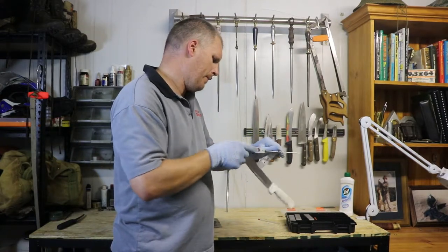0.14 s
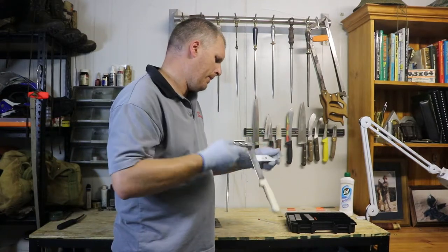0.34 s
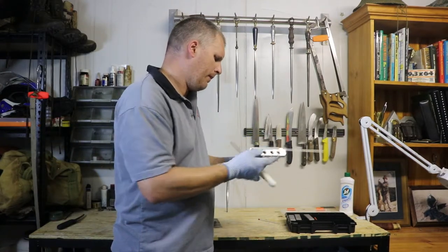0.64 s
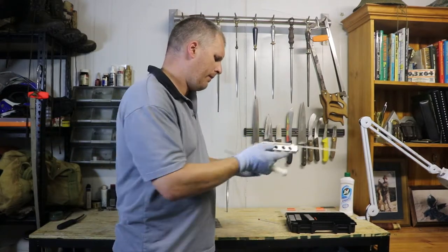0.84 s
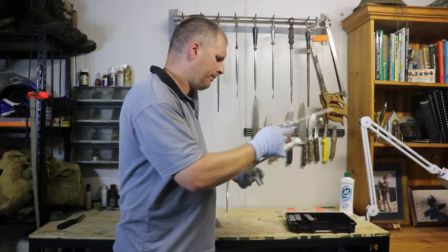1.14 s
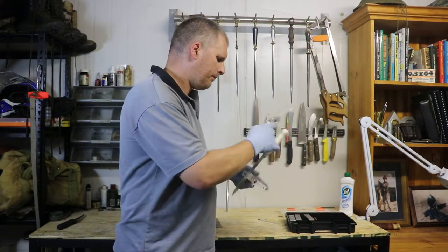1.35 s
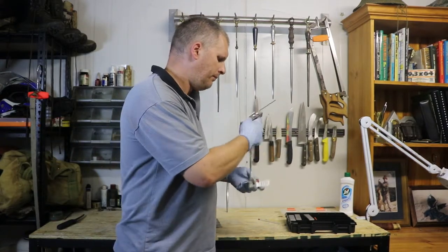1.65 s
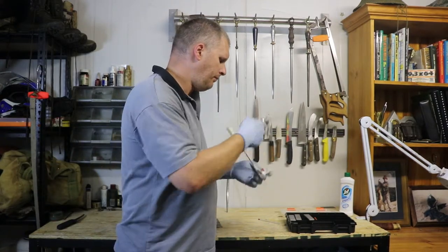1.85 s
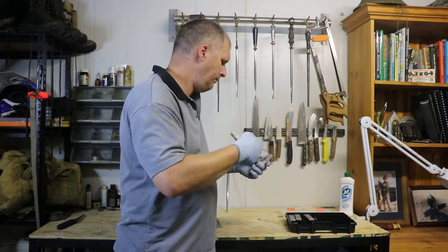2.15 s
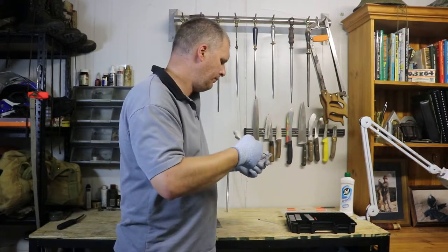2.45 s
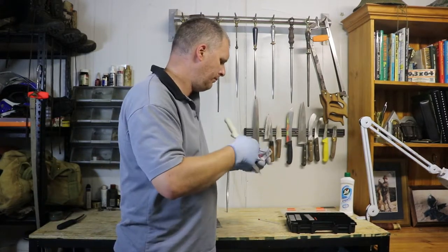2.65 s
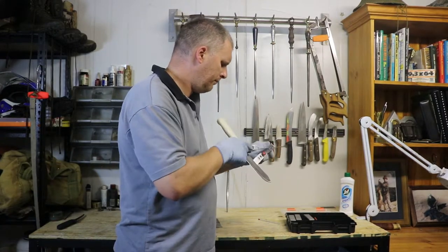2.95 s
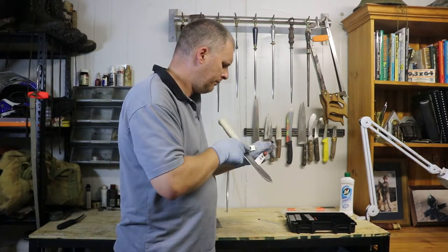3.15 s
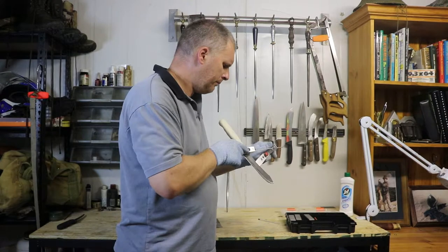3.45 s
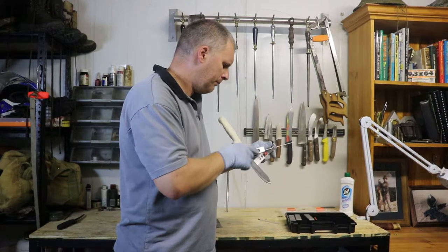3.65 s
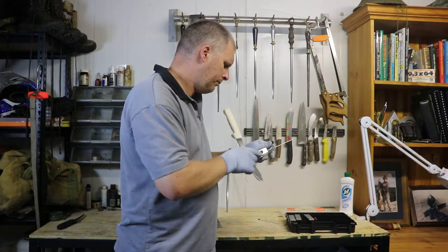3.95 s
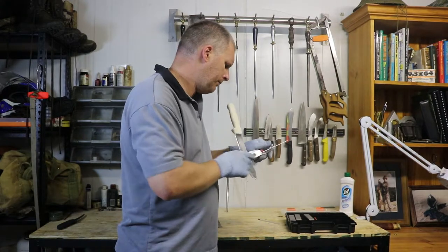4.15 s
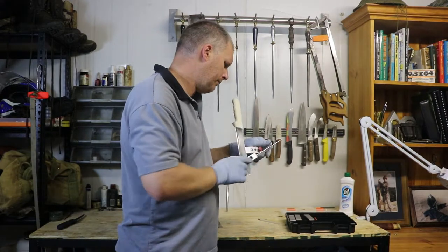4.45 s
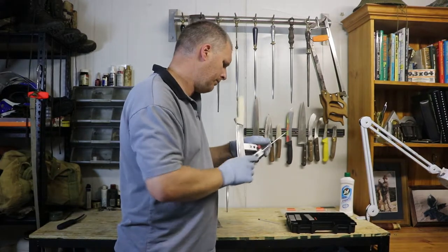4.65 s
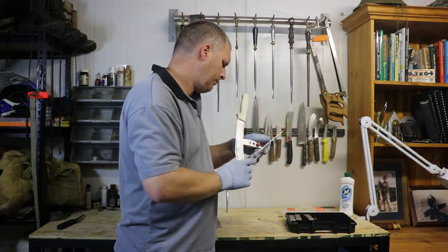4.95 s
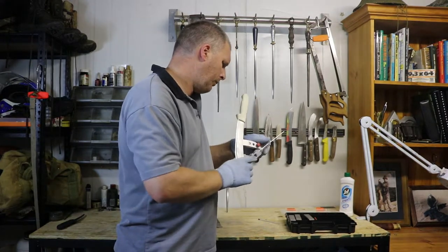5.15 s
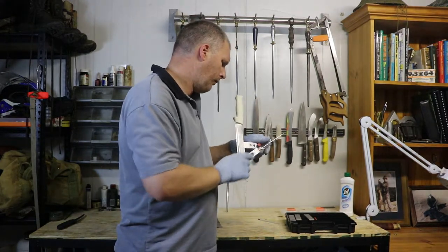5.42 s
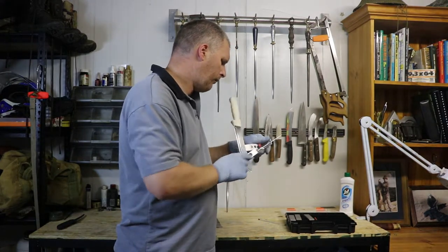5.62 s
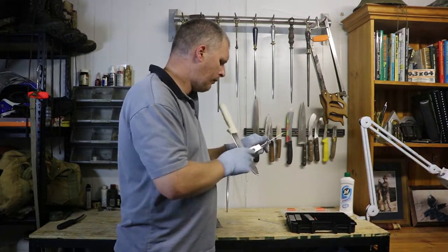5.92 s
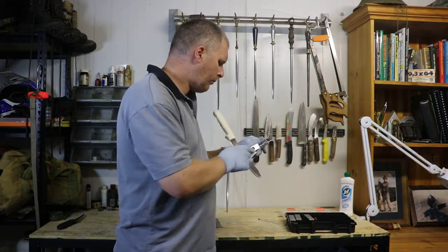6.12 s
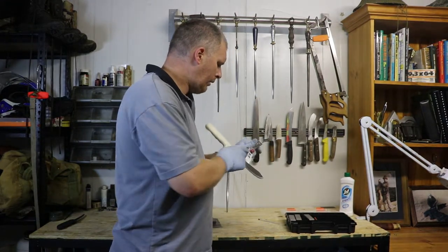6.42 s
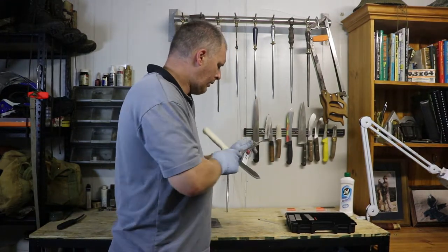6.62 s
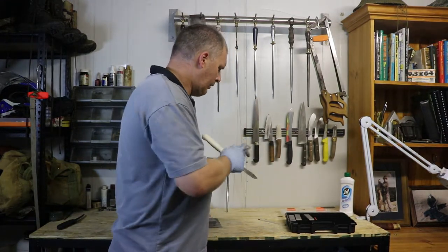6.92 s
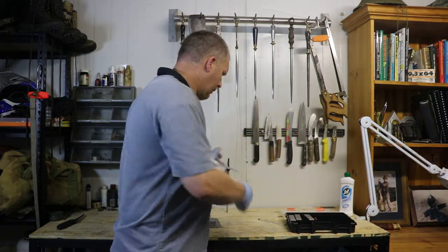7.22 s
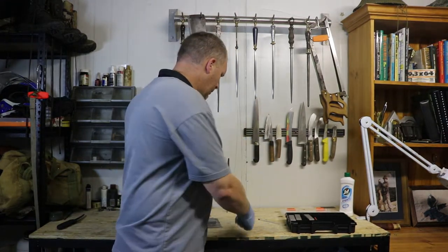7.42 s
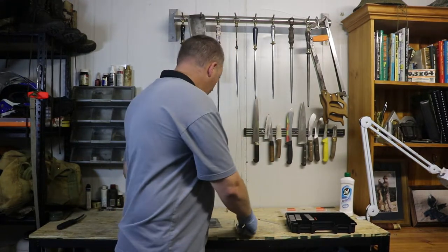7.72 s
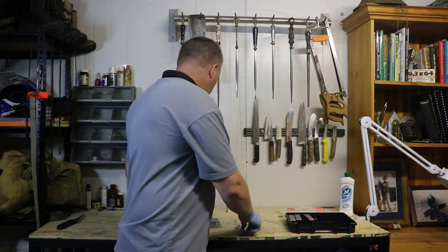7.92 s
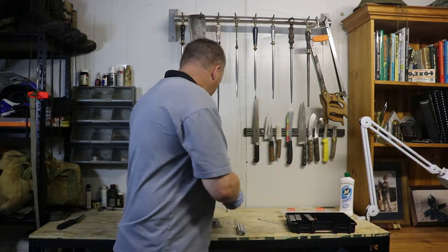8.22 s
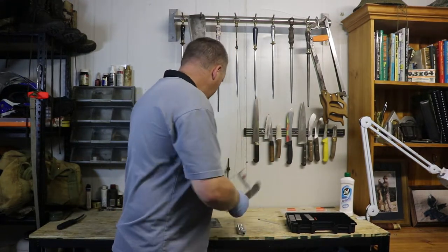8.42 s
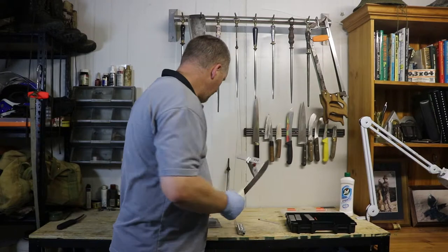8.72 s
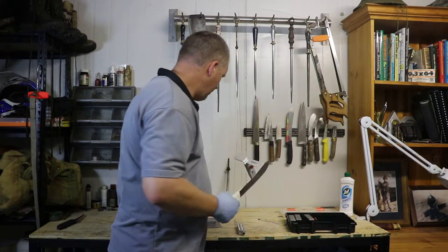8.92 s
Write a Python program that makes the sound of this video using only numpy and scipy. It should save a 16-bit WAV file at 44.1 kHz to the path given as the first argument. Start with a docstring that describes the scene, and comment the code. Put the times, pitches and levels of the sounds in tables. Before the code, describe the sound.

A fine stone rubs in soft, gritty circles along a clamped knife edge, then knocks and rattles down on a wooden bench in a quiet workshop.

```python
"""Small workshop: a fine stone on a guide rod is rubbed in small circles along a knife edge clamped in a jig.
Strokes are grit noise through blade resonances, with a contact resonance climbing along each pass.
In a pause the rod slides (filtered friction noise) and the stone clicks on the steel (clamp modes and noise).
Later the stone in its holder knocks on the bench (two sets of modes) and chatters to rest (dense grains);
a few last rubs follow. Soft handling bumps, air noise and a faint machine hum lie beneath."""
import sys
import numpy as np
from scipy import signal
from scipy.fft import rfft, irfft
from scipy.io import wavfile
from scipy.ndimage import uniform_filter1d

SR = 44100
rng = np.random.default_rng(int(sys.argv[2]) if len(sys.argv) > 2 else 0)


def wrap_up_sound(samples):
    """Save the sound to the file named by the first command line argument, as 16-bit audio."""
    columns = np.atleast_2d(samples).T
    # keep every value between -1 and 1, then stretch to whole-number steps
    tamed = np.clip(columns, -1, 1)
    steps = np.round(tamed * 32767).astype(np.int16)
    wavfile.write(sys.argv[1], SR, steps)


N = 399987
TIME = np.arange(N) / SR
FREQ = np.maximum(np.fft.rfftfreq(N, 1 / SR), 1)
RING = SR // 2  # samples in one decay


def undb(db):
    """Decibels to gain."""
    return 10 ** (np.asarray(db) / 20)


def unit(x):
    """Scale to an rms of one."""
    return x / np.sqrt(np.mean(x ** 2))


def across(points, hz=FREQ):
    """Read (f/Hz, value) points on a log-frequency axis."""
    f, value = np.transpose(points)
    return np.interp(np.log(hz), np.log(f), value)


def shape(x, response):
    """Filter by a frequency response."""
    return irfft(rfft(x) * response, N)


def butter(x, order, hz, kind):
    """Butterworth filter, kind "low" or "high"."""
    return signal.sosfilt(signal.butter(order, hz, kind, fs=SR, output="sos"), x)


def resonance(hz, width_hz):
    """Response of one resonance, gain one at its centre."""
    return 1 / (1 + 1j * hz / width_hz * (FREQ / hz - hz / FREQ))


def body(modes):
    """Response of an object with several resonances."""
    return sum(undb(db) * resonance(hz, width_hz) for hz, width_hz, db in modes)


def ring(modes):
    """Free decay of a struck object; wide modes die first."""
    t = TIME[:RING]
    total = np.zeros(RING)
    for k, (hz, width_hz, db) in enumerate(modes):
        decay = np.exp(-np.pi * width_hz * t)
        total += (-1) ** k * undb(db) * width_hz * decay * np.sin(2 * np.pi * hz * t)
    return unit(total)


def crack(t60_s, low_hz):
    """The brief noisy burst of two hard faces meeting."""
    burst = rng.standard_normal(RING) * undb(-60 * TIME[:RING] / t60_s)
    return unit(butter(burst, 3, low_hz, "high"))


def add(track, s, sound, db, hard_hz):
    """Place a blow: softer contact cuts its treble; db is its energy spread over 10 ms."""
    sound = butter(sound, 3, hard_hz, "low")
    sound = sound * undb(db) * np.sqrt(SR / 100 / np.sum(sound ** 2))
    start = int(s * SR)
    track[start:start + RING] += sound[:N - start]


def grains(rate_per_s, spread_db):
    """Tiny impacts at random moments and sizes; a negative spread weakens a few of them."""
    size = undb(spread_db * np.minimum(rng.exponential(size=N), 4))
    hit = rng.random(N) < rate_per_s / SR
    return unit(rng.standard_normal(N) * size * hit)


def walk(rate_hz):
    """Slow random curve with a spread near one."""
    knots = rng.standard_normal(N // 20)
    return 1.2 * np.interp(TIME * rate_hz, np.arange(len(knots)), knots)


def swell(t, s, length_s, rise_share=0.51):
    """Speed of a hand movement: from rest up to one at time s, and back to rest."""
    share = np.where(t < s, rise_share, 1 - rise_share)
    return np.exp(-((t - s) / (length_s * share)) ** 2)


# likeness of the two sides: f/Hz, likeness/0-1
SIDE_LIKENESS = [(40, 0.46), (150, 0.25), (260, 0.44), (380, 0.24), (700, 0.4), (1500, 0.044),
                 (5000, 0.032), (15000, 0.19)]


def diffuse():
    """Noise from all around; the likeness of its two sides varies with frequency."""
    like = across(SIDE_LIKENESS)
    mid = shape(rng.standard_normal(N), np.sqrt((1 + like) / 2))
    side = shape(rng.standard_normal(N), np.sqrt((1 - like) / 2))
    return np.array([mid + side, mid - side])


# reverberation: f/Hz, t60/s
REVERB_T60 = [(100, 0.7), (350, 0.33), (1400, 0.38), (4000, 0.34), (10000, 0.27), (16000, 0.03)]


def room_tail(build_s):
    """Dense wall echoes that build up quickly and die band by band."""
    t = TIME[:RING]
    spectrum = rfft(diffuse()[:, :RING])
    f = np.fft.rfftfreq(RING, 1 / SR)
    centre_hz = np.array(REVERB_T60)[:, 0]
    edges_hz = [0, *np.sqrt(centre_hz[1:] * centre_hz[:-1]), SR]
    tail = 0
    for lo, hi, (_, t60_s) in zip(edges_hz, edges_hz[1:], REVERB_T60):
        band = irfft(spectrum * (f >= lo) * (f < hi), RING)
        tail = tail + band * np.exp(-np.log(1000) * t / t60_s)
    return unit(tail * (1 - np.exp(-t / build_s))) / np.sqrt(RING)


def place(x, tail, wet_db, right_db, left_lag):
    """Source in the room, louder to the right; direct sound reaches the left left_lag samples late."""
    left = np.roll(x, left_lag) * undb(-right_db / 2)
    right = x * undb(right_db / 2)
    echoes = signal.fftconvolve(x[None], tail, axes=1)[:, :N]
    return (np.array([left, right]) + undb(wet_db) * echoes) / np.hypot(1, undb(wet_db))


# room air colour: f/Hz, relative density/dB per Hz
AIR_COLOUR = [(12, -60.5), (20, -13.5), (38, -6), (122, -5.5), (191, -5), (452, -5), (519, -5.5),
              (631, -16.5), (686, -9.5), (1300, -12.5), (1670, -13.5), (2090, -13.5), (3000, -15),
              (4070, -15.5), (15500, -25.5)]
# machine drones: f/Hz, width before squaring/Hz, level/dB rms
MACHINE_DRONE = [(45.7, 7, -68.5), (101, 6, -72), (201.2, 6, -74), (630, 84, -67)]
# machine tones: f/Hz, level/dB rms
MACHINE_TONES = [(554.3, -67.5), (646.4, -65)]


def workshop(air_db=-53.5, waver_db=1.78):
    """Wavering air noise, and a machine: broad drones and two tones with wandering phase."""
    air = unit(shape(diffuse(), undb(across(AIR_COLOUR)))) * undb(air_db + waver_db * walk(4.1))
    drone_power = 0
    for hz, width_hz, db in MACHINE_DRONE:
        drone_power = drone_power + (undb(db) * unit(np.abs(resonance(hz, width_hz)) ** 2)) ** 2
    drone = shape(diffuse(), np.sqrt(drone_power))
    tones = np.zeros(N)
    for hz, db in MACHINE_TONES:
        tones += undb(db) * unit(np.sin(2 * np.pi * hz * TIME + 0.2 * walk(3.8)))
    return air + drone + tones


# dull noise of hands and bench: t/s, length/s, level/dB, f/Hz, width before squaring/Hz
HANDLING = [(5.082, 0.168, -59, 872, 160), (5.79, 0.089, -61, 1140, 150), (6.51, 0.054, -47.5, 660, 130),
            (6.942, 0.05, -55, 1100, 850), (8.057, 0.13, -44.5, 150, 45), (8.304, 0.64, -62, 86.8, 42.5),
            (8.817, 0.049, -52, 177, 249), (8.909, 0.099, -46.5, 448, 610), (9.062, 0.036, -46.5, 890, 900)]


def bumps():
    """Soft swells of handling: noise through a squared resonance."""
    out = np.zeros(N)
    for s, length_s, db, hz, width_hz in HANDLING:
        dull = unit(shape(rng.standard_normal(N), resonance(hz, width_hz) ** 2))
        out += dull * undb(db) * swell(TIME, s, length_s)
    return out


# chatter colour before the bench modes: f/Hz, relative density/dB per Hz
CHATTER_COLOUR = [(60, -29.5), (200, -22), (400, -9.5), (800, -9), (1500, -5), (2400, -11.5), (3600, -19.5),
                  (5500, -34.5), (9000, -58.5), (15000, -62)]


def chatter(bench_db=-14, peak_s=8.205, length_s=0.15, rise_share=0.61, level_db=-28):
    """Quick small bounces on the bench as the stone settles: one swell of dense grains."""
    bounces = grains(rate_per_s=2600, spread_db=-0.8)
    low_cut = 1 / (1 + (80 / FREQ) ** 4)
    colour = undb(across(CHATTER_COLOUR)) * (1 + undb(bench_db) * body(BENCH_MODES)) * low_cut
    return unit(shape(bounces, colour)) * undb(level_db) * swell(TIME, peak_s, length_s, rise_share)


# guide rod modes: f/Hz, width/Hz, level/dB
ROD_MODES = [(843, 11, 0), (2158, 34, 0.5), (3270, 62, -8.5), (6940, 140, -13), (7700, 170, -13),
             (8800, 150, -20), (11150, 160, -29), (13491, 160, -21)]
# pushes of the rod through its slot: t/s, length/s, level/dB
ROD_PUSHES = [(1.05, 0.21, -62.5), (1.218, .13, -55.5), (1.457, 0.11, -55.5), (1.602, 0.16, -60),
              (1.733, 0.063, -54), (1.78, .04, -53), (1.89, .06, -54)]


def rod(scrape_db=-23):
    """The thin guide rod sings faintly as it slides through the jig: uneven friction noise rings its modes."""
    friction = rng.standard_normal(N) * undb(3.3 * walk(29.56))
    effort = sum(undb(db) * swell(TIME, s, length_s) for s, length_s, db in ROD_PUSHES)
    response = body(ROD_MODES) + undb(scrape_db) * resonance(5700, 9000)
    return unit(shape(friction, response)) * effort


# clamp modes: f/Hz, width/Hz, level/dB
CLAMP_MODES = [(907, 35, -3), (1222, 34, -8.5), (1820, 95, -9.5), (2375, 160, -7.5), (2820, 170, -7),
               (3500, 120, -3.5), (4610, 100, 1), (6030, 100, 1), (6760, 100, 6), (8270, 100, 10.5),
               (8750, 84, 5), (9100, 79, 9), (9650, 83, 1.5), (11200, 70, 4), (10600, 140, 7),
               (11500, 110, -1), (12300, 60, -3), (13300, 120, -5), (14200, 140, -5)]
# clicks that ring the clamp (first the clamp opening, then the stone on the steel): t/s, level/dB, hardness
# f/Hz
CLAMP_CLICKS = [(.035, -43.5, 1900), (2.4823, -32, 6900), (2.4853, -40, 8550), (2.5878, -33.5, 9100),
                (2.5905, -25, 16000)]


def clicks(crack_db=-4):
    """The clamp opens with a ring, and later the stone is set against the clamped blade: each click rings the
    clamp and adds a noisy crack."""
    out = np.zeros(N)
    for s, db, hard_hz in CLAMP_CLICKS:
        sound = ring(CLAMP_MODES) + undb(crack_db) * crack(t60_s=0.039, low_hz=4370)
        add(out, s, sound, db, hard_hz)
    return out


# bench top modes: f/Hz, width/Hz, level/dB
BENCH_MODES = [(150, 30, -22.5), (357.5, 22, 7), (381, 45, 2.5), (453, 20, 8), (502, 72, -2), (674, 11, 2),
               (1020, 86, -1), (1145, 27, 6.5), (1264, 41, -2), (1500, 24, -1.5), (1620, 46, -8),
               (1920, 64, 6.5), (2100, 90, 2), (2404, 57, 1.5), (2610, 78, 5.5), (3240, 200, -6),
               (3800, 150, -1.5)]
# stone holder modes: f/Hz, width/Hz, level/dB
HOLDER_MODES = [(261, 34, 1.5), (352, 44, 0), (764, 34, 8), (856, 99, 2), (1060, 21, -1.5), (1520, 19, 4),
                (1713, 110, 4.5), (1830, 170, 2.5), (2260, 120, -5), (2515, 71, 5), (2950, 270, 3),
                (3500, 55, -17), (3330, 61, -6), (3710, 120, 0.5), (4020, 70, -11.5), (4660, 150, -0.5)]
# landings: t/s, level/dB, first contact hardness f/Hz, holder's energy share/0-1, crack re ring/dB
LANDINGS = [(7.685, -39.5, 4000, 0.2, 4), (7.729, -36, 6000, 0.6, 10), (7.7475, -18.5, 4300, .95, 2.5),
            (7.7538, -15, 3200, 0.97, -2.5), (7.9606, -22.5, 371, 0.12, -30.5), (8.006, -29, 2450, .5, 10),
            (8.012, -19.5, 619, 0.05, 8), (8.036, -26, 990, 0, -2), (8.0844, -10, 2580, 0.13, 4.5)]
# one corner strikes; the rest follows, slightly stronger and duller
FOLLOW_S, FOLLOW_DB, FOLLOW_HARDNESS_RATIO = 0.0032, 1, 0.71


def knocks(modes, part, lowest_hz=105):
    """Two contacts per landing ring one object, which takes the given part of their energy."""
    out, tone = np.zeros(N), ring(modes)
    for (s, db, hard_hz, _, crack_db), share in zip(LANDINGS, np.clip(part, 1e-3, 1)):
        share_db = 10 * np.log10(share)
        for k in range(2):
            sound = tone + undb(crack_db) * crack(t60_s=0.046, low_hz=600)
            level_db = db + k * FOLLOW_DB + share_db
            add(out, s + k * FOLLOW_S, sound, level_db, hard_hz * FOLLOW_HARDNESS_RATIO ** k)
    return butter(out, 2, lowest_hz, "high")


# blade and jig modes under the stone: f/Hz, width/Hz, level/dB
BLADE_MODES = [(2324, 160, -3.5), (2730, 26, 2.5), (3650, 31, -3), (4310, 100, -7), (5850, 29, -7),
               (6420, 35, 2), (8580, 49, -2.5), (10800, 92, -52), (10420, 81, -17), (11350, 140, -9),
               (12900, 61, -12), (13900, 34, 5), (14500, 35, -1)]
# grit colour: f/Hz, level/dB per quarter octave
GRIT_COLOUR = [(700, -30.5), (1000, -25.5), (1400, -15.5), (1700, -9), (2000, -6.5), (2400, -7), (3300, -1),
               (4800, -2), (6700, 0), (9500, 1), (12000, -1.5), (15500, -5.5)]


def rasp(blade_db=4, judder_db=1.0):
    """Grit catches on the edge and rings the blade."""
    grit = grains(rate_per_s=6000, spread_db=-0.5) * undb(judder_db * walk(140))
    rung = unit(shape(grit, 1 + undb(blade_db) * body(BLADE_MODES)))
    quarter_octave_hz = FREQ * np.log(2) / 4
    return shape(rung, undb(across(GRIT_COLOUR)) * np.sqrt(SR / 2 / quarter_octave_hz))


def flecks(grid, depth_db=4.5):
    """Gain over (frequency, time): shifting contact favours narrow bands for hundredths of a second."""
    field = uniform_filter1d(rng.standard_normal(grid), size=2, axis=0)
    for frames in (12, 8):
        field = uniform_filter1d(field, size=frames, axis=1)
    return unit(undb(depth_db * unit(field)))


# passes of stone or glove over the steel, two per circle while honing:
# t of peak speed/s, length/s, level before gain_db/dB, tilt/dB per octave, contact f at peak speed/Hz
PASSES = [(0.044, 0.041, -48, -1, 1750), (0.087, 0.061, -48.5, 2, 1900), (0.202, 0.098, -57.5, 0.7, 2400),
          (0.395, 0.15, -56, 1.3, 2400), (0.447, 0.049, -54.5, -3, 3100), (2.1, 0.067, -57, -0.7, 1900),
          (2.819, 0.15, -58.5, -1.6, 4030), (2.934, 0.075, -61, -5.5, 2500),
          (3.17, 0.16, -71.5, -1.0, 3300), (3.446, 0.25, -80, 2, 3000), (3.712, 0.17, -54.0, 0.5, 2560),
          (3.87, 0.125, -51.5, -1.4, 2180), (4.024, 0.18, -56, -0.4, 2960), (4.252, 0.3, -63, 3.5, 6800),
          (4.364, 0.11, -57.5, 0, 6000), (4.527, 0.12, -53.5, -1.3, 4750), (4.674, 0.11, -52.5, 1.8, 3050),
          (4.834, 0.12, -55.5, 1.2, 6370), (4.987, 0.12, -57.5, -0.5, 2340), (5.134, 0.13, -59.5, -1, 4500),
          (5.305, 0.111, -55.0, -2, 4700), (5.448, 0.15, -58.5, 1.5, 1700), (5.614, 0.134, -57, 1.2, 5000),
          (5.786, 0.126, -55.5, 0.0, 7800), (5.928, 0.1, -51, 0.3, 4430), (6.095, 0.13, -59, 1.5, 4800),
          (6.271, 0.18, -57.0, 0, 2800), (6.433, 0.14, -58.0, -0.7, 5300), (6.593, 0.12, -50.5, -2, 3100),
          (6.752, 0.13, -50.5, -2, 6000), (6.91, 0.12, -53, -0.1, 14000), (7.059, 0.13, -52, -1.5, 6550),
          (7.137, 0.067, -52.5, 2, 2700), (8.435, 0.14, -67.5, 0.5, 7000),
          (8.897, 0.086, -53.5, -6.5, 1800), (9.062, 0.034, -44.0, -6.5, 1800)]
PASS_RISE_SHARE = 0.47
PIVOT_HZ = 3940  # the tilt turns about this point
# the contact resonance climbs over each pass length and sags where the stone is slow
CLIMB_OCTAVES, SAG_OCTAVES = 1.4, 1
CONTACT_DB, CONTACT_OCTAVES = 6, 0.42  # its height and width


def honing(gain_db=-0.31):
    """The rasp follows the speed of each pass, and a contact resonance arches upward through it."""
    stft = dict(fs=SR, nperseg=512, noverlap=384)
    hz, t, frames = signal.stft(rasp(), **stft)
    octave = np.log2(np.maximum(hz, hz[1]) / PIVOT_HZ)[:, None]
    power = np.zeros(frames.shape)
    for s, length_s, db, tilt_db, contact_hz in PASSES:
        active = np.abs(t - s) < 2 * length_s
        speed = swell(t[active], s, length_s, PASS_RISE_SHARE)
        climb = CLIMB_OCTAVES * (t[active] - s) / length_s
        centre = np.log2(contact_hz / PIVOT_HZ) + climb - SAG_OCTAVES * (1 - speed)
        near = np.exp(-((octave - centre) / CONTACT_OCTAVES) ** 2)
        level_db = db + tilt_db * np.maximum(octave, -2) + CONTACT_DB * near
        power[:, active] += (speed * undb(level_db)) ** 2
    rubbed = frames * np.sqrt(power) * flecks(frames.shape)
    return undb(gain_db) * signal.istft(rubbed, **stft)[1][:N]


def scene():
    """Workshop, jig and bench in one room."""
    tail = room_tail(build_s=0.0016)
    holder_share = np.array(LANDINGS)[:, 3]
    settling = place(chatter(), tail, wet_db=-7, right_db=2.5, left_lag=1)
    # the wide bench top is heard mostly by the direct path
    bench_top = knocks(BENCH_MODES, 1 - holder_share) + bumps()
    bench = place(bench_top, tail, wet_db=-7, right_db=1.5, left_lag=0)
    holder = place(knocks(HOLDER_MODES, holder_share), tail, wet_db=0, right_db=2.0, left_lag=0)
    taps = place(clicks(), tail, wet_db=3.0, right_db=7.5, left_lag=1)
    jig = place(honing() + rod(), tail, wet_db=-4, right_db=4, left_lag=1)
    return workshop() + settling + bench + holder + taps + jig


def record(dry, low_hz=42, top_hz=15750):
    """The recorder drops the deepest bass, clips at full scale and cuts the top."""
    clipped = np.clip(butter(dry, 4, low_hz, "high"), -1, 1)
    return signal.sosfilt(signal.ellip(10, 0.2, 70, top_hz, fs=SR, output="sos"), clipped)


dry = scene()
out = record(dry)
wrap_up_sound(out)
```